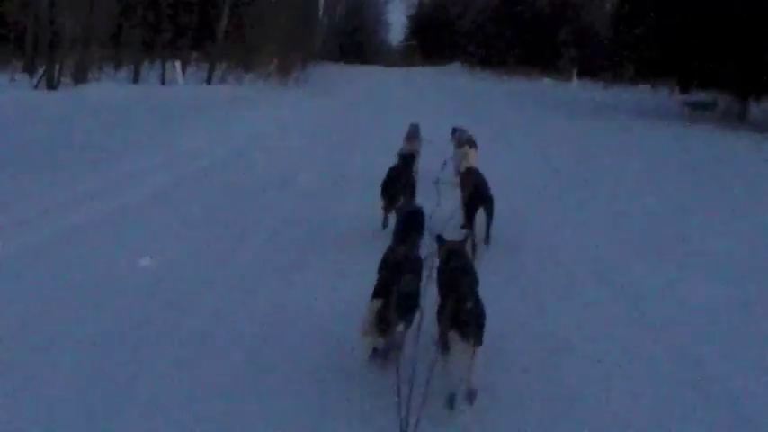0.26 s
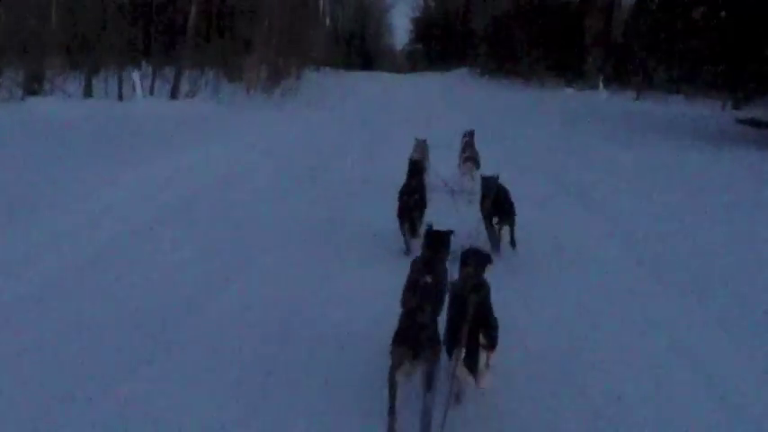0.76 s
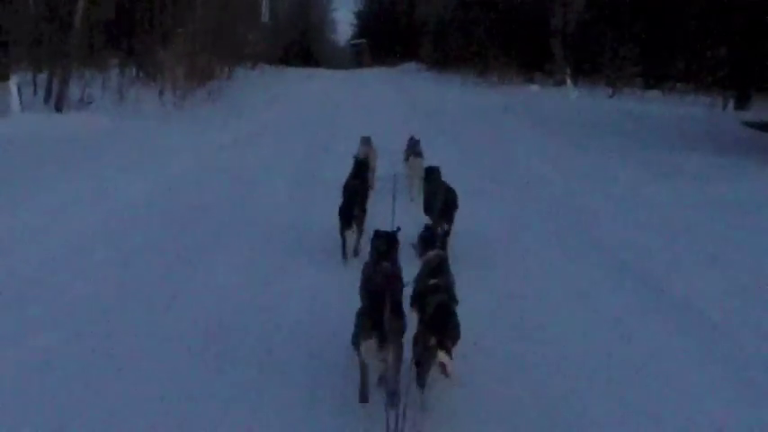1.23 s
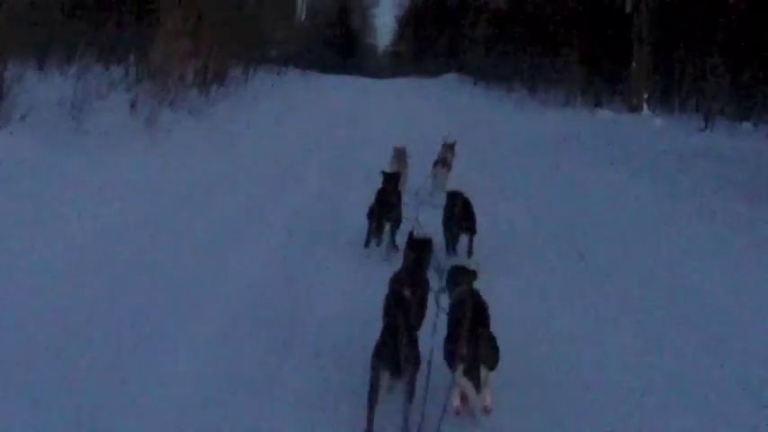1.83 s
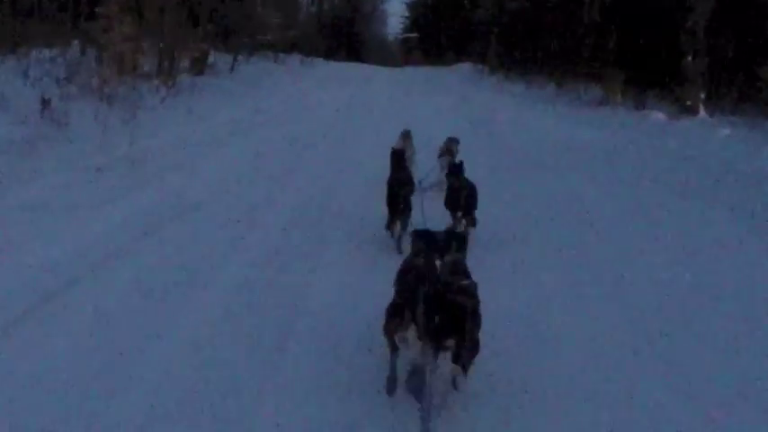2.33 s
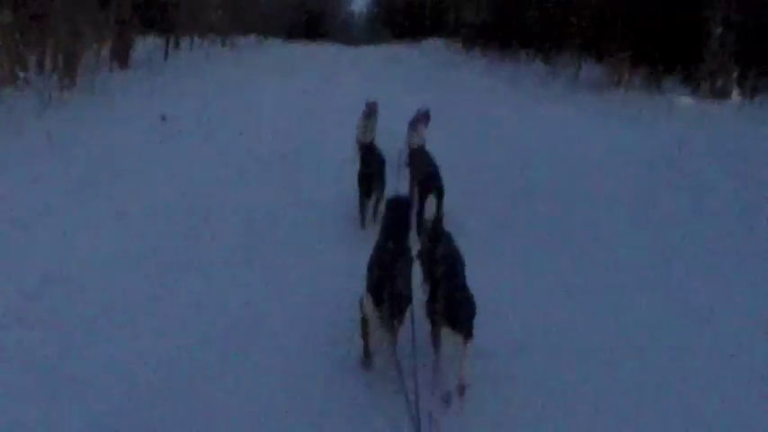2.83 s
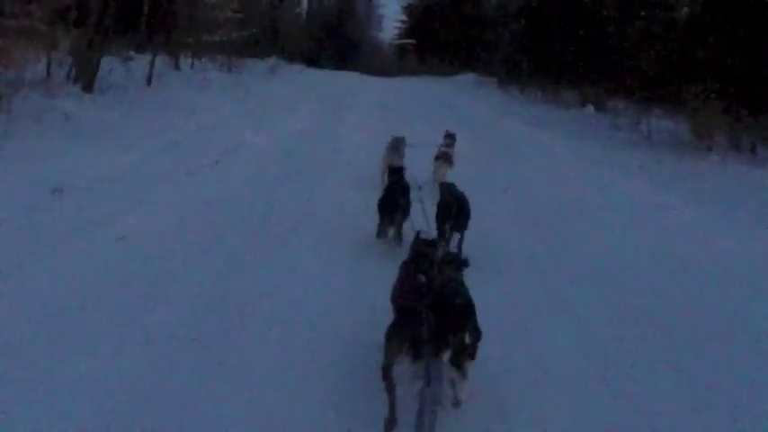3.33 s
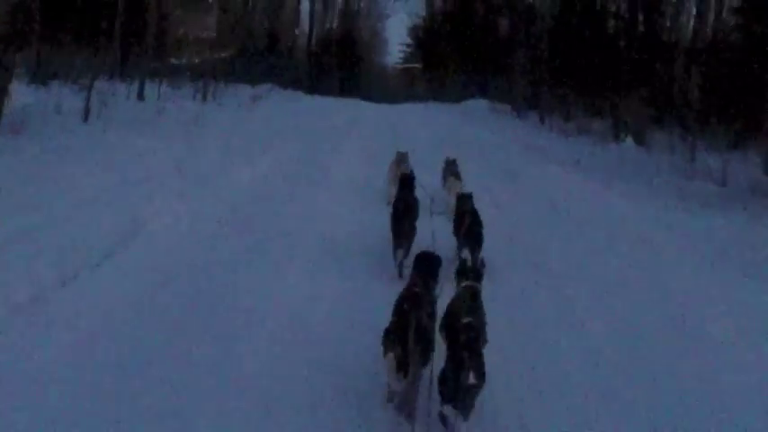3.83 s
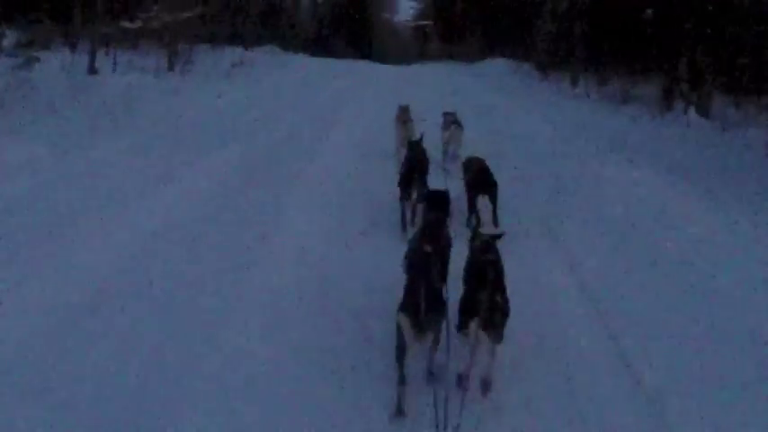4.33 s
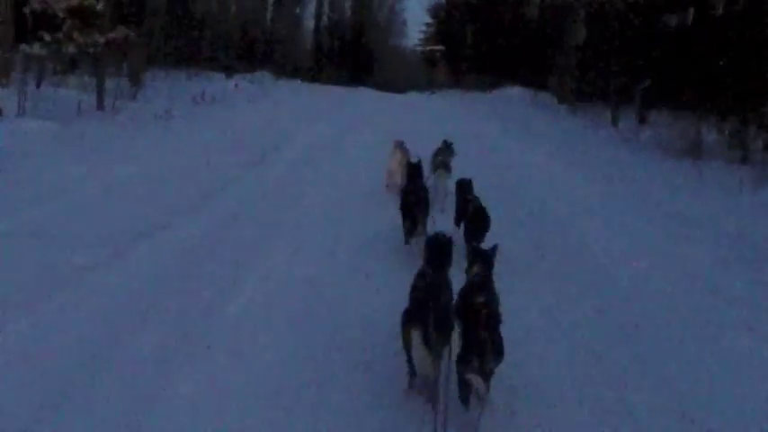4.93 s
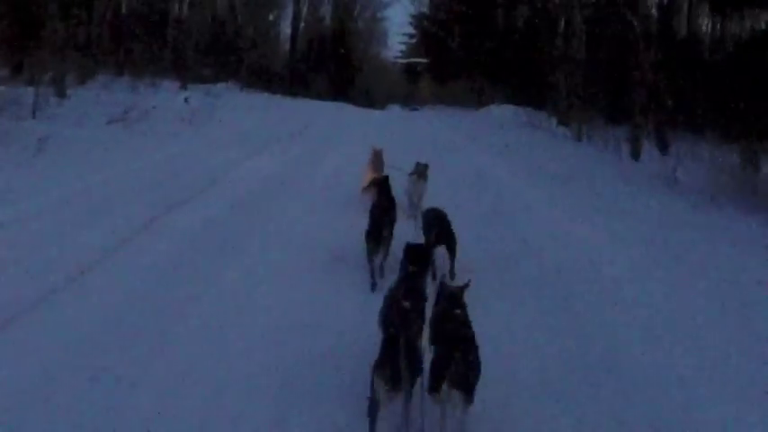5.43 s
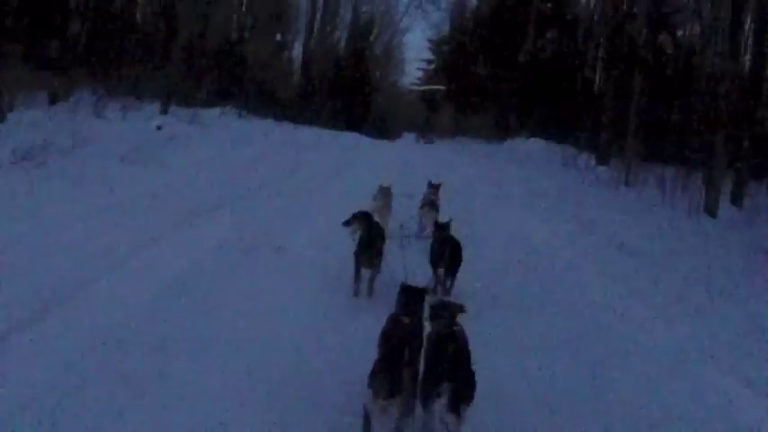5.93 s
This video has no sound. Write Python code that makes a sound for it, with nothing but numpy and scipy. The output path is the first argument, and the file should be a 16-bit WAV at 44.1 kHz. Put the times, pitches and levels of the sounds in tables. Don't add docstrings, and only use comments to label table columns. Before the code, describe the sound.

From a microphone sealed in a small hard case on a moving dog sled: steady grainy snow hiss, faint drone, and low buffeting wind. A sharp snap bursts out at the start, briefly pushing everything down. Dogs' paws crunch dully ahead, the mount chirps faintly, and three weaker contacts hit the case at uneven intervals on the open snowy trail.

```python
import sys
import numpy as np
from scipy import signal
from scipy.fft import rfft, irfft, next_fast_len
from scipy.io import wavfile
from scipy.ndimage import uniform_filter1d, map_coordinates

SR = 44100
rng = np.random.default_rng(int(sys.argv[2]) if len(sys.argv) > 2 else 0)


def magnitude_from_level(level_db):
    exponent = np.asarray(level_db, float) / 20
    return 10 ** exponent


def store_wav(level_fs):
    pcm = np.round(np.clip(np.atleast_2d(level_fs), -1, 1) * 32767)
    wavfile.write(sys.argv[1], SR, pcm.T.astype(np.int16))


N = 272083


def unit(x):
    return x / np.sqrt(np.mean(x ** 2) + 1e-20)


def curve(points):
    seconds, level_db = np.transpose(points)
    return np.interp(np.arange(N) / SR, seconds, level_db)


def wobble(rate):
    knots = rng.standard_normal(int(N * 60 / SR) + 4)
    return map_coordinates(knots, [np.arange(N) * rate / SR])


def filtered(x, gain_db):
    size = next_fast_len(N + 8192)
    hz = np.fft.rfftfreq(size, 1 / SR)
    return irfft(rfft(x, size) * magnitude_from_level(gain_db(hz)), size)[:N]


def coloured(x, spectrum):
    points_hz, level_db = np.transpose(spectrum)
    return filtered(x, lambda hz: np.interp(np.log(hz + 1), np.log(points_hz + 1), level_db))


def patchy(depth_db):
    cells = signal.stft(rng.standard_normal(N + 1024), nperseg=256)[2]
    field = uniform_filter1d(rng.standard_normal(cells.shape), size=4, axis=0)
    field = uniform_filter1d(field, size=8, axis=1)
    noise = signal.istft(cells * magnitude_from_level(depth_db * unit(field)), nperseg=256)[1]
    return unit(noise[:N])


def crystals(per_second, spread_db):
    breaks = rng.random(N) < per_second / SR
    push = rng.standard_normal(N)
    size = np.minimum(rng.exponential(size=N), 3)
    return unit(breaks * push * magnitude_from_level(spread_db * size))


# (frequency [Hz], level per Hz [dB])
THUMP_TONE = [(8.8, -44), (15, -1.5), (38, 1.5), (53, 3.5), (65, -5.5), (82, -16.5), (100, -29), (130, -24),
              (170, -55), (290, -120)]
# (time of the peak [s], peak level [dB], fall time [s])
GUSTS = [(0, -40, 0.069), (.36, -48, 0.14), (.64, -41, 0.024), (.76, -37, .04), (.87, -34, 0.05),
         (.97, -37, 0.065), (1.08, -39, 0.018), (1.17, -41, .1), (1.48, -44.5, 0.085), (1.59, -33, 0.028),
         (1.8, -45.5, 0.22), (2.2, -41, 0.038), (2.47, -46, 0.11), (2.72, -38.5, .07), (2.96, -45, 0.043),
         (3.14, -37, 0.072), (3.36, -42, 0.089), (3.49, -35, 0.034), (3.64, -39.5, 0.059),
         (3.745, -33.5, 0.051), (3.87, -40.5, 0.051), (4.01, -37.5, 0.082), (4.19, -44, 0.022),
         (4.48, -38.5, 0.069), (4.62, -39.5, 0.074), (4.81, -46, 0.043), (5.05, -47.5, 0.09),
         (5.31, -50, 0.067), (5.55, -41, 0.033), (5.97, -46.5, 0.076)]


def wind():
    breeze_db, rise_over_fall = -48, 0.58
    eddies = coloured(rng.standard_normal(N), THUMP_TONE)
    power = uniform_filter1d(uniform_filter1d(eddies ** 2, size=2400), size=2400)
    strength = np.sqrt(np.abs(power))
    even = unit(eddies / (strength + 0.15 * np.std(eddies)))
    t = np.arange(0, N, 64) / SR
    force = np.full(len(t), magnitude_from_level(breeze_db))
    for peak, db, fall in GUSTS:
        duration = np.where(t < peak, rise_over_fall * fall, fall)
        force += magnitude_from_level(db) * np.exp(-((t - peak) / duration) ** 2)
    return np.interp(np.arange(N) / SR, t, force) * even


# (time [s], peak level [dB], pitch [Hz], length [s])
SQUEAKS = [(0.78, -27, 2175, 0.007), (1.003, -26.5, 2163, 0.011), (1.024, -29, 2270, 0.015),
           (1.3418, -31, 2060, 0.0091), (1.592, -33, 2090, 0.014), (1.901, -31.5, 2060, 0.009),
           (1.95, -29.5, 2410, 0.012), (1.992, -33.5, 2530, 0.0064), (2.405, -32, 2350, 0.011),
           (2.585, -32, 2540, 0.016), (2.693, -28, 2465, 0.0078), (2.9791, -33, 2420, 0.014),
           (3.212, -37, 2400, 0.011), (3.297, -29, 2540, 0.011), (3.562, -31, 2490, 0.011),
           (3.833, -29.5, 2295, 0.011), (3.885, -28, 2426, 0.02), (4.047, -20.5, 2350, 0.015),
           (4.167, -28.5, 2230, 0.012), (4.475, -28, 2530, 0.0083), (5.408, -31, 2525, 0.013),
           (5.7104, -33, 2020, 0.032), (5.783, -26, 2240, 0.01), (5.891, -25.5, 2080, 0.011),
           (5.857, -34, 2060, 0.015), (5.949, -31, 2434, 0.014), (5.962, -32, 2040, 0.0089),
           (6.033, -25.5, 2230, 0.0086), (6.088, -29.5, 2126, 0.017), (6.13, -29.5, 2385, 0.014)]


def squeaks():
    out, t = np.zeros(N + SR), np.arange(SR // 10) / SR
    for start, db, hz, length in SQUEAKS:
        age = t / length * 4
        jolts = uniform_filter1d(rng.standard_normal(len(t)), size=40)
        wander = 0.11 * np.cumsum(jolts)
        tone = np.sin(2 * np.pi * hz * t + wander)
        out[round(start * SR):][:len(t)] += magnitude_from_level(db - 2) * age ** 2 * np.exp(-age) * tone
    return out[:N]


# (time [s], level [dB], contact time [s], crack level [dB], crack dullness [Hz])
SNAPS = [
    (0.1067, 11, 0.00019, -9, 6500),
    (1.678, -10, 0.00052, -18, 3500),
    (4.2874, 1, .0011, -14, 5900),
    (5.5234, -6, 0.0012, -22, 4000),
]
# (frequency [Hz], level [dB], time to fall 60 dB [s])
CRACKED = [(1670, -4, 0.013), (1856, -31, 0.092), (2040, -3, 0.019), (2350, 1.5, 0.009),
           (3400, -4.5, 0.0088), (3860, -11.5, 0.016), (4300, -18, 0.0065), (4730, -20, 0.0069),
           (5100, -14.5, 0.0096), (6230, -25, 0.0038), (9500, -10.5, 0.005), (10240, -7, 0.0037),
           (11600, -9, 0.0028), (14200, -16, 0.004)]
TICKED = [(600, -12, 0.011), (1040, -22, 0.012), (1610, -5.5, 0.014), (2060, -6.5, 0.01), (2540, -6, 0.017),
          (2900, -18, 0.0097), (3220, -15, .012), (4770, -21, 0.0036), (6200, -30, .003)]
KNOCKED = [(155, -3.5, 0.031), (1160, -5, 0.0085), (1526, -15, 0.021), (1820, -33.5, 0.15),
           (2080, 1.5, 0.011), (2366, -5, 0.017), (2940, -17, .014), (3630, -19, 0.024), (4230, -28, 0.016),
           (4620, -22, .012), (5600, -21, .01), (5370, -23, 0.02), (8280, -29, .007), (14100, -18, .003)]
TAPPED = [(1463, -8, 0.023), (1970, -1, 0.0097), (2365, -0.5, .016), (2740, -4.5, 0.018), (3270, -35, .014),
          (3700, -20, 0.018), (4370, -27, .006), (5050, -22.5, 0.011), (644, -20, 0.024)]


def snaps():
    crack_t60, jolt_db, jolt_s = 0.006, -16, 0.0002
    hard_s = 0.000069
    case_sound, jolts = np.zeros(N + SR), np.zeros(N + SR)
    t = np.arange(SR // 4) / SR
    rung = [CRACKED, TICKED, KNOCKED, TAPPED]
    for (start, db, contact, crack_db, dull_hz), modes in zip(SNAPS, rung):
        ring = np.zeros(len(t))
        for k, (hz, mode_db, t60) in enumerate(modes):
            swell = 1 - np.exp(-(t * max(hz / 2600, 1) / contact) ** 2)
            ring += (-1) ** k * magnitude_from_level(mode_db - 60 * t / t60) * swell * np.sin(2 * np.pi * hz * t)
        burst = rng.standard_normal(len(t)) * magnitude_from_level(crack_db - 60 * t / crack_t60)
        crack = signal.lfilter(*signal.butter(2, dull_hz, fs=SR), burst)
        push = magnitude_from_level(db + jolt_db) * np.sqrt(hard_s / contact)
        first = round(start * SR)
        case_sound[first:][:len(t)] += magnitude_from_level(db) * (ring + crack)
        jolts[first:][:len(t)] -= push * t / jolt_s * np.exp(-t / jolt_s)
    stiff = signal.butter(N=2, Wn=800, btype="high", fs=SR)
    return signal.lfilter(*stiff, case_sound[:N]) + jolts[:N]


# (frequency [Hz], width [Hz], lift [dB])
CASE_AIR = [
    (149.5, 14, 3.5),
    (411, 17, 3.5),
    (2146, 51, 2.5),
    (2530, 75, 5),
    (10000, 670, 2.5),
]


def enclosed(x):
    def lift_db(hz):
        return sum(db / (1 + (2 * (hz - centre) / width) ** 2) for centre, width, db in CASE_AIR)
    return filtered(x, lift_db)


# (time [s], peak level [dB], mid-band share [dB])
PAWS = [(0.7736, -42, 3), (0.995, -31.5, -24), (1.1243, -36.5, 3), (1.3405, -37.5, -7), (1.515, -43.5, 13),
        (1.802, -41.5, 6), (1.925, -39.5, 7), (1.9954, -38, -9), (2.351, -33.5, 4.5), (2.4723, -38.5, 2),
        (2.665, -38, 1), (2.688, -37, 1), (2.814, -38.5, 0), (2.8524, -36.5, 5.5), (3.0994, -38, -10),
        (3.617, -40, 4), (3.8038, -39, 5.5), (3.856, -44, 2), (4.0013, -40, 8), (4.11, -35.5, 2),
        (4.1683, -37.5, 2), (4.476, -41, -5), (4.567, -39, 7), (4.6284, -39, 1), (4.8075, -44, -3),
        (4.8534, -43, -12), (5.4266, -39.5, -6), (5.7404, -42, 9), (5.955, -45, 6), (5.97, -46, -6)]
# (frequency [Hz], level [dB])
DISTANT = [(5000, 0.5), (7000, -7.5), (12000, -4)]


def paws():
    high, mid, t = np.zeros(N + SR), np.zeros(N + SR), np.arange(SR // 8) / SR
    fall = magnitude_from_level(-60 * t / 0.069) + 0.5 * magnitude_from_level(-60 * t / 0.26)
    step = (1 - np.exp(-t / 0.0047)) * fall
    for start, db, mid_db in PAWS:
        first = round(start * SR)
        high[first:][:len(t)] += magnitude_from_level(db - 6.5) * step
        mid[first:][:len(t)] += magnitude_from_level(db - 10.5 + mid_db) * step
    crust = rng.standard_normal(N) + 0.68 * crystals(per_second=3000, spread_db=5)
    crunch = np.zeros(N)
    for strength, tone in [(high, SPRAY_TONE), (mid, HISS_TONE)]:
        crunch += coloured(crust * strength[:N], tone) / np.std(coloured(crust, tone))
    return coloured(crunch, DISTANT)


# (time [s], hiss level [dB])
GLIDE = [(0, -35.5), (.1, -40.5), (0.75, -39.5), (0.84, -39), (1.35, -40), (2.8, -41), (3.1, -40.5),
         (3.84, -41.5), (4.03, -40), (5.11, -43), (5.28, -42), (6.03, -41.5), (6.17, -41)]
# (frequency [Hz], level per Hz [dB])
DRONE_TONE = [(53, -33), (90, 3), (113, -0.5), (194, -1), (273, -8.5), (324, -8), (408, -4.5), (465, -9),
              (541, -9.5), (592, -0.5), (655, -4.5), (703, 1.5), (732, -4), (793, -17.5), (1000, -17.5),
              (1300, -27), (2200, -120)]
# (frequency [Hz], level per Hz [dB])
HISS_TONE = [(530, -51), (900, -27), (1150, -20.5), (1410, -7), (1660, -6), (1800, -5), (1960, -5.5),
             (2070, 1), (2220, -4), (2420, -1), (3130, -8), (3450, -10), (3800, -23), (4940, -42),
             (8360, -120)]
# (frequency [Hz], level per Hz [dB])
SPRAY_TONE = [(2060, -25), (3500, -3), (3770, -7.5), (3970, -3.5), (4880, -0.5), (5630, -4), (6580, -10.5),
              (7940, -15.5), (10100, -14.5), (11000, -22), (12000, -17.5), (14500, -29), (15000, -29),
              (15600, -39)]


def sled():
    load_db = curve(GLIDE)
    swing_db = load_db - load_db.mean()
    bumps_db = 1.1 * wobble(14) + 0.45 * wobble(35)
    drone_db = -49.5 + 0.57 * swing_db + bumps_db
    hiss_db = load_db - 4 + 0.61 * bumps_db
    spray_db = -52 + 0.49 * swing_db + 1.4 * bumps_db
    drone = patchy(depth_db=0.53)
    hiss = patchy(depth_db=1.0) + magnitude_from_level(-7.0) * crystals(per_second=900, spread_db=2.5)
    spray = patchy(depth_db=2.5) + magnitude_from_level(-7.5) * crystals(per_second=1500, spread_db=1.5)
    out = unit(coloured(drone, DRONE_TONE)) * magnitude_from_level(drone_db)
    out += unit(coloured(hiss, HISS_TONE)) * magnitude_from_level(hiss_db)
    out += unit(coloured(spray, SPRAY_TONE)) * magnitude_from_level(spray_db)
    return out


def scene():
    snow = sled() + paws()
    mix = wind() + enclosed(snow) + squeaks() + snaps()
    return mix[None]


def band_limit(x):
    return signal.sosfilt(signal.butter(12, 16500, fs=SR, output="sos"), x)


# (time [s], level [dB])
DUCK = [
    (.094, 1),
    (.0955, -12.5),
    (.15, -6.5),
    (.4, -4.5),
    (.72, 2),
]
# (frequency [Hz], level [dB])
MICROPHONE = [(14600, -1), (15200, -4), (15380, -36), (15900, -16), (16400, -20)]


def record(dry):
    clipped = np.clip(dry * magnitude_from_level(curve(DUCK)), -1, 1)
    return band_limit(coloured(clipped[0], MICROPHONE)[None])


dry = scene()
out = record(dry)
store_wav(out)
```